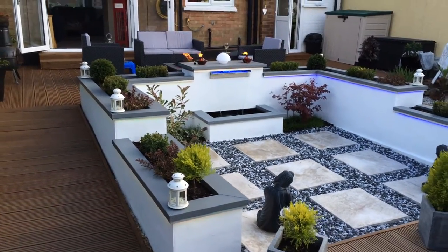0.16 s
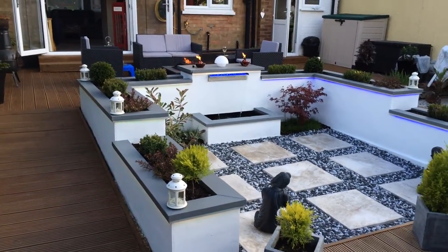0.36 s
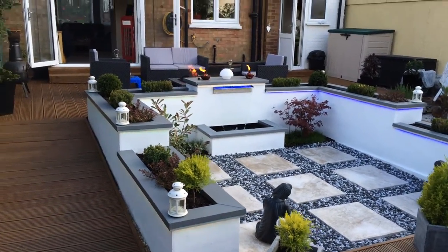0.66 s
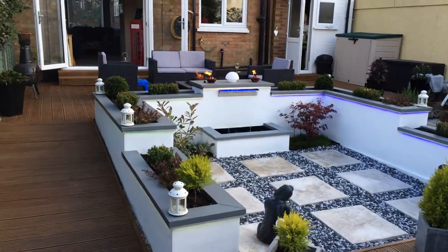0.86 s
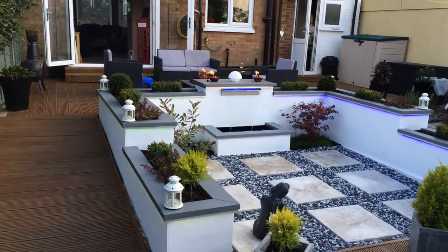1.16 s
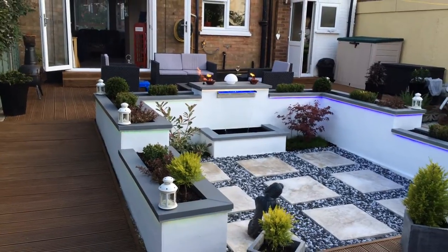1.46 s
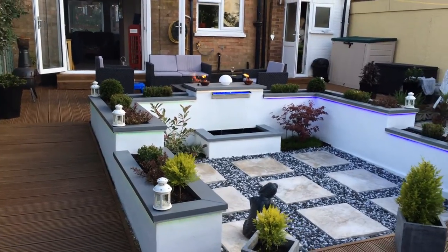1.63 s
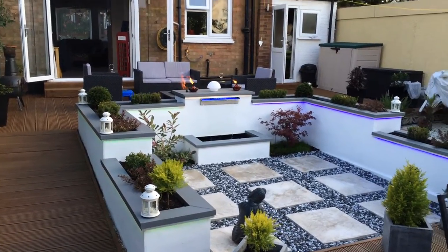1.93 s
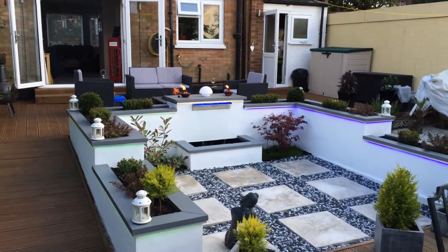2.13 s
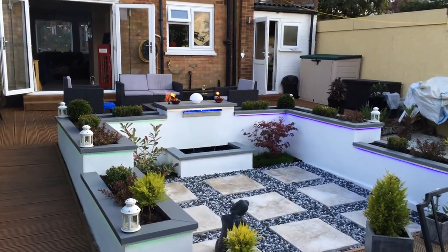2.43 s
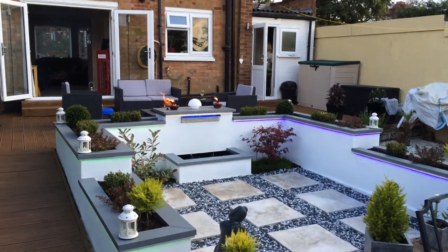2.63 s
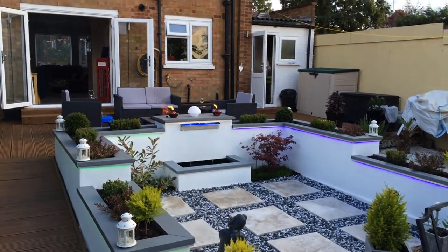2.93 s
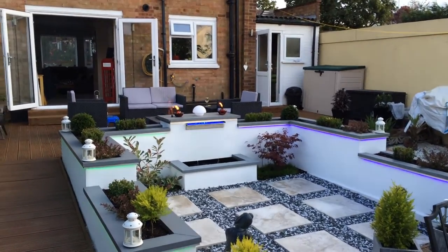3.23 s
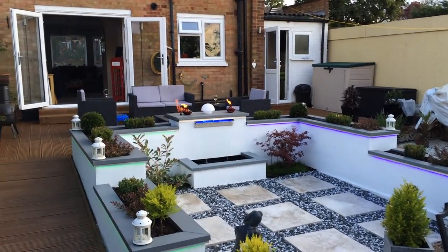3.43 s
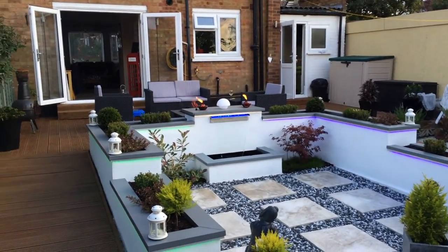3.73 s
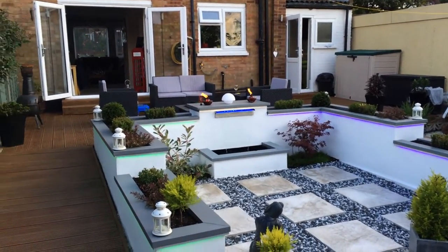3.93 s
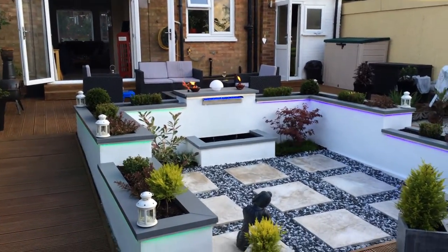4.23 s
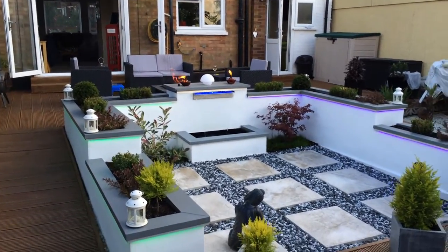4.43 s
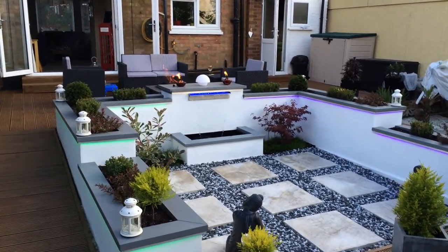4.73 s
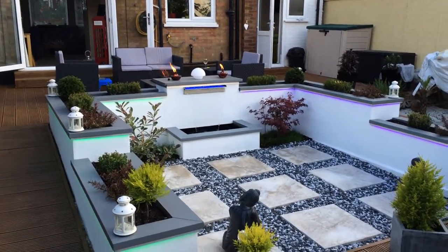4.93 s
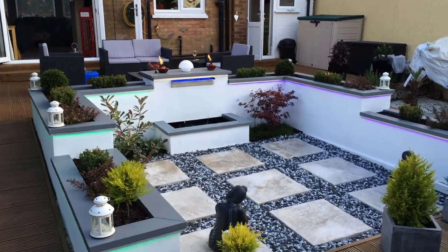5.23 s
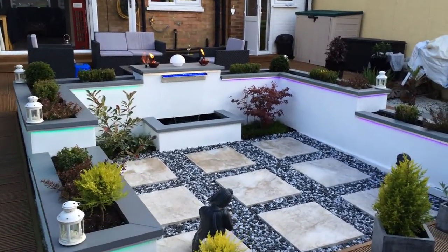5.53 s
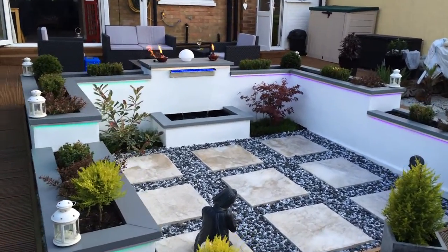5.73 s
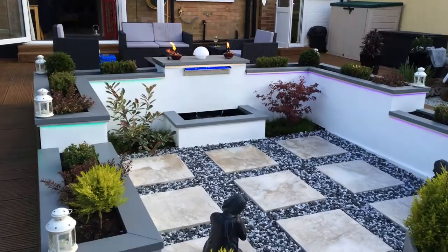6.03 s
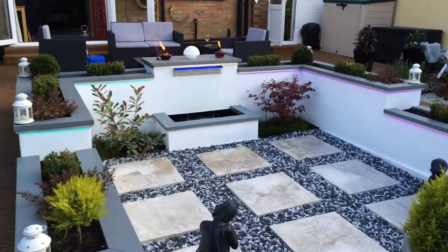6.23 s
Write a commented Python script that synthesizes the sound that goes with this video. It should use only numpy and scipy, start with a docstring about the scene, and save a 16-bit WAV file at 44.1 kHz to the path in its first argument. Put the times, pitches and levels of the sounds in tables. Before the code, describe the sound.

A thin stream of water trickles and bubbles steadily into a small garden pool, with soft handling bumps and a few sharp echoing clicks.

```python
"""From the start a thin stream of water trickles into a raised pool in a walled garden: noise wash, splash
grains and small ringing bubbles, over low churning, outdoor rumble, a far drone and a faint pump hum.
Soft bumps of the hand-held camera, damped thumps and case rattles, and larger bubble plips soon join in.
From 1.2 s sharp clicks, filtered pulses, bounce off paving, wall and house; near 2 s the grip changes.
The drone swells near 2.4 and 5 s, and the strongest clicks come from 3 s on."""
import sys
import numpy as np
from scipy import signal
from scipy.fft import rfft, irfft
from scipy.io import wavfile
from scipy.ndimage import uniform_filter1d

SR = 44100
rng = np.random.default_rng(int(sys.argv[2]) if len(sys.argv) > 2 else 0)


def wav_record(signal):
    """Record a signal, one row per channel, as 16-bit PCM in the file named by sys.argv[1]."""
    frames = np.transpose(np.atleast_2d(signal))
    bounded = np.clip(frames, -1, 1)
    # unit amplitude maps onto the largest positive 16-bit level
    quanta = np.round(bounded * 32767).astype(np.int16)
    wavfile.write(sys.argv[1], SR, quanta)


N = 280917  # length in samples
TIME = np.arange(N) / SR


def gain_of(db):
    """Decibels to amplitude."""
    return 10 ** (np.asarray(db) / 20)


def evened(x):
    """Scales to rms 1."""
    return x / np.sqrt(np.mean(x ** 2) + 1e-20)


def unit(x):
    """Scales to energy 1."""
    return x / (np.linalg.norm(x) + 1e-20)


def read(points, hz):
    """Reads a table on a log-frequency axis."""
    f, value = np.transpose(points)
    return np.interp(np.log(hz + 1), np.log(f + 1), value)


def add(mix, s, sound):
    """Mixes a sound in at time s."""
    part = mix[max(round(s * SR), 0):][:len(sound)]
    part += sound[:len(part)]


def coloured(x, points):
    """Filters by a spectrum; rms 1."""
    hz = np.fft.rfftfreq(len(x), 1 / SR)
    return evened(irfft(rfft(x) * gain_of(read(points, hz)), len(x)))


def drift(hz):
    """Slow chance up to about hz; rms 1."""
    lowpass = np.exp(-(np.fft.rfftfreq(N, 1 / SR) / hz) ** 2)
    return evened(irfft(rfft(rng.standard_normal(N)) * lowpass, N))


def swells(events):
    """Sums bell-shaped rises and dips, each given as (t/s, height, length/s)."""
    return sum(height * np.exp(-((TIME - s) / length) ** 2) for s, height, length in events)


def pulse(db):
    """The shortest causal pulse (minimum phase) with this spectrum; energy 1."""
    mirrored_db = np.r_[db, db[-2:0:-1]]
    log_gain = np.log(gain_of(np.maximum(mirrored_db, -70)))
    return unit(np.fft.ifft(np.exp(np.conj(signal.hilbert(log_gain)))).real)


def humps(peaks, hz):
    """The gain in dB of a few resonances."""
    return sum(db / (1 + (2 * (hz - f) / width) ** 2) for f, width, db in peaks)


def chance_times(per_s):
    """Irregular moments: one somewhere in each slot of 1 / per_s seconds."""
    slots = np.arange(int(per_s * N / SR) + 1)
    return (slots + rng.random(len(slots))) / per_s


# the hand changes its grip once, and with it the hollow around the microphone
REGRIP_S, REGRIP_LENGTH_S = 2, 0.33


def second_grip(s):
    """How far the hand has moved into its second grip, 0-1."""
    return .5 + .5 * np.tanh((s - REGRIP_S) / REGRIP_LENGTH_S)


# decay time of the garden's scatter: (f/Hz, t60/s)
GARDEN_DECAY = [(200, 0.64), (2000, 0.25), (5000, 0.3), (9000, 0.28), (15000, 0.14)]


def garden_tail(uneven_db=2.5, rise_s=0.0037):
    """Scatter from plants, gravel and walls: echoes of uneven size whose treble dies first."""
    sizes = gain_of(uneven_db * np.repeat(rng.standard_normal(SR // 32), 16))
    echoes = sizes * rng.standard_normal(len(sizes))
    hz, t, z = signal.stft(echoes, SR, nperseg=256)
    decay = gain_of(-60 * t / read(GARDEN_DECAY, hz)[:, None])
    tail = signal.istft(z * decay, SR, nperseg=256)[1]
    return unit(tail * np.clip(np.arange(len(tail)) / SR / rise_s, 0, 1))


def scatter(x, count=6):
    """Drops land all over the pool, so successive moments take different paths through the garden."""
    spot = np.floor(TIME * 80) % count
    out = np.zeros(N)
    for k in range(count):
        share = uniform_filter1d(1. * (spot == k), size=160)
        out += signal.oaconvolve(x * share, garden_tail())[:N]
    return out


def wash(patchy_db=2.0, flicker_db=2.0, smooth_hz=3800):
    """Countless merged splashes: patchy where bubbles ring, a fine even hiss above."""
    frames, hz = N // 128 + 5, np.fft.rfftfreq(512, 1 / SR)
    real, imaginary, patches = rng.standard_normal((3, frames, 257))
    patches = uniform_filter1d(patches, size=6, axis=0)
    patches = evened(uniform_filter1d(patches, size=4, axis=1))
    flicker = evened(uniform_filter1d(rng.standard_normal(frames), size=5))[:, None]
    level_db = patchy_db * patches / (1 + (hz / smooth_hz) ** 2) + flicker_db * flicker
    z = (real + 1j * imaginary) * gain_of(level_db)
    return signal.istft(z.T, nperseg=512, noverlap=384)[1][:N]


SPLASHES_PER_S = 800  # over all 16 pitches


def splashes(spread_db=2.5, wet_db=-2):
    """Drops smack the pool: grains of a cycle or two, a few much larger than the rest."""
    t, out = np.arange(256) / SR, np.zeros(N)
    for hz in np.geomspace(900, 14000, 16):
        size = gain_of(spread_db * np.minimum(rng.exponential(1, N), 4.5))
        hits = size * (rng.random(N) < SPLASHES_PER_S / 16 / SR)
        grain = unit(np.sin(2 * np.pi * hz * t) * np.exp(-hz * t / 0.81))
        out += signal.oaconvolve(hits, np.sqrt(hz) * grain)[:N]
    return out + gain_of(wet_db) * scatter(out)


def bubble(hz, cycles, rise):
    """Trapped air rings, rising in pitch as it nears the surface."""
    t = np.arange(2400) / SR
    age = t * hz / cycles
    ring = np.sin(2 * np.pi * hz * t * (1 + rise * np.minimum(age, 5)))
    return ring * np.exp(-age) * np.minimum(t * hz / 5, 1)  # fades in over five cycles


BUBBLES_PER_S = 230


def bubbles(low_hz=850, high_hz=3300, cycles=6.8, rise=0.021, spread_db=2.2, wet_db=-8):
    """A steady stream of small bubbles of random pitch, size and life."""
    out = np.zeros(N)
    for when, pitch, size, life in rng.random((int(BUBBLES_PER_S * N / SR), 4)):
        hz = low_hz * (high_hz / low_hz) ** pitch
        size_gain = gain_of(-spread_db * np.log(size + 0.054))
        add(out, when * N / SR, size_gain * unit(bubble(hz, cycles * (.5 + life), rise)))
    return out + gain_of(wet_db) * scatter(out)


# the trickle's spectrum: (f/Hz, relative level/dB per Hz)
WATER_SPECTRUM = [(150, -9.5), (350, -4.5), (600, -1.1), (1000, -2.5), (1400, -3), (1850, -0.5),
                  (2400, -4.5), (2900, -6), (3500, -5), (4200, -7), (5500, -5.5), (6600, -7), (8000, -11),
                  (11500, -13), (15000, -19)]
# resonances that colour the water, before random variation:
# (f/Hz, width/Hz, level/dB in the first grip, level/dB in the second)
HAND_HOLLOW = [(954, 110, 0.5, -0.5), (1280, 110, 2.5, 2), (1686, 56, 3.5, 5.5), (1680, 71, 0, -1.5),
               (2153, 59, 7, 3.5), (2550, 130, 3.5, 7), (3370, 114, -4, 5), (5040, 230, 4.5, 1.5)]


def in_basin(x, detune=0.02, vary=0.52, wander_hz=7, count=3):
    """The pool's colour and the hollow of the hand; resonances waver as the stream wanders. Rms 1."""
    hz, out = np.fft.rfftfreq(4096, 1 / SR), np.zeros(N)
    nearness = np.exp([drift(wander_hz) for spot in range(count)])
    later = second_grip(TIME)
    for share in nearness / nearness.sum(0):
        for grip, weight in enumerate([1 - later, later]):
            peaks = []
            for f, width, *db in HAND_HOLLOW:
                peak_hz = f * (1 + detune * rng.standard_normal())
                peaks.append((peak_hz, width, db[grip] * (1 + vary * rng.standard_normal())))
            colour = pulse(read(WATER_SPECTRUM, hz) + humps(peaks, hz))
            out += share * weight * signal.oaconvolve(x, colour)[:N]
    return evened(out)


SPUTTER_HZ, SPUTTER_DB = 27, 1.03  # smaller surges come at random
SPATTER_HZ, SPATTER = 250, 0.19  # surges land as spatters: fastest rate, depth as a share of their dB
# the stream slaps harder and throws spray, or slackens: (t/s, strength/dB before shares, length/s)
STREAM_SURGES = [(0.12, 5.5, 0.017), (0.217, 8.5, 0.023), (0.271, 6.5, 0.031), (0.499, 7, 0.032),
                 (0.54, 0, 0.021), (0.575, 2, 0.0081), (0.635, -4.5, 0.025), (0.689, 7.5, 0.011),
                 (0.902, 5.5, 0.031), (1.235, 3.5, 0.025), (2.124, 6.5, 0.012), (2.21, 0, 0.015),
                 (2.292, 3.5, 0.012), (2.68, 7, 0.0067), (3.37, 5, 0.019), (5.524, 8.5, 0.016),
                 (5.594, 8, 0.018), (5.82, 8, 0.011), (6.175, 7, 0.017)]


def surge_strength():
    """The unsteady stream's strength in dB: named and random surges, broken into spatters."""
    strength_db = SPUTTER_DB * drift(SPUTTER_HZ) + swells(STREAM_SURGES)
    return strength_db * (1 + SPATTER * np.clip(drift(SPATTER_HZ), -2, 2))


# loudness of the trickle: (t/s, level/dB before body and spray trims, extra spray level/dB)
STREAM_FLOW = [(0, -56, 0.5), (1.3, -56, 1), (1.9, -56, 0), (2.6, -55.5, -1), (3.2, -56.5, 1),
               (3.7, -57, 0), (4.2, -55, -1), (4.6, -56.5, -1), (5.1, -54.5, -0.5), (5.85, -56.5, 1),
               (6.37, -53.5, 1)]


def trickle(wash_db=-3.0, splash_db=-3, bubble_db=-5, body_db=1, spray_db=-4.5, split_hz=3000,
            body_share=0.38, spray_share=0.64, drop_share=0.26):
    """Wash, splashes and bubbles sound in the basin; surges lift the separate drops and the spray most."""
    surge_db = surge_strength()
    drops = gain_of(splash_db) * in_basin(splashes()) + gain_of(bubble_db) * in_basin(bubbles())
    water = gain_of(wash_db) * in_basin(wash()) + gain_of(drop_share * surge_db) * drops
    # body below the split, spray above it
    lowpass = signal.butter(4, split_hz, fs=SR, output="sos")
    body = signal.sosfiltfilt(lowpass, water)
    times, flow_db, extra_db = np.transpose(STREAM_FLOW)
    spray_level_db = spray_db + np.interp(TIME, times, extra_db) + spray_share * surge_db
    spray = evened(water - body) * gain_of(spray_level_db)
    body = body * gain_of(body_db + body_share * surge_db)
    return gain_of(np.interp(TIME, times, flow_db)) * (body + spray)


# the churning of the pool under the stream: (f/Hz, relative level/dB per Hz)
GURGLE_SPECTRUM = [(80, -34), (130, -13), (180, 3), (250, -6), (330, -2), (450, -12), (800, -34.5)]


def gurgle(level_db=-69.0, lumpy_db=4.0):
    """Low churning that comes and goes in uneven lumps."""
    lumps = gain_of(lumpy_db * np.clip(drift(9.5), -2, 1.5))
    churning = lumps * coloured(rng.standard_normal(N), GURGLE_SPECTRUM)
    return gain_of(level_db) * evened(churning)


# outdoor rumble: (f/Hz, relative level/dB per Hz)
RUMBLE_SPECTRUM = [(10, -50), (22, -38), (38, -12), (60, -10), (85, -3), (130, -4), (180, 2), (260, -4),
                   (350, -8), (600, -18), (1500, -26.5)]


def rumble(level_db=-60.5, lumpy_db=2):
    """Outdoor rumble: low noise whose level drifts in lumps."""
    return gain_of(level_db + lumpy_db * drift(9.4)) * coloured(rng.standard_normal(N), RUMBLE_SPECTRUM)


DRONE_HZ = 54.6
DRONE_START_DB, DRONE_GROWTH_DB_PER_S = -74.5, 1  # its mean rms level under the swells
# swells added to the drone: (t/s, mean rms level/dB, length/s)
FAR_DRONE_SWELLS = [(2.372, -64, 0.21), (5.003, -69, 0.7)]


def drone(waver=0.68):
    """A far drone: one low tone, unsteady in level and phase, that grows slowly and swells."""
    level = gain_of(DRONE_START_DB + DRONE_GROWTH_DB_PER_S * TIME)
    level += swells([(s, gain_of(db), length) for s, db, length in FAR_DRONE_SWELLS])
    tone = np.sin(2 * np.pi * DRONE_HZ * TIME + waver * drift(5.2))
    return np.sqrt(2) * level * gain_of(2.4 * drift(7.8)) * tone


HUM_HZ, HUM_DB = 101.3, -65.5  # level: mean rms
HUM_START_DB = -1.5  # the hum starts weaker and comes up over the first second or two


def hum(waver=0.75):
    """The faint hum of the pump: one tone that wavers in level and phase."""
    level_db = HUM_DB + HUM_START_DB * np.exp(-TIME ** 2) + 2.6 * drift(5.9)
    tone = np.sin(2 * np.pi * HUM_HZ * TIME + waver * drift(23.0))
    return np.sqrt(2) * gain_of(level_db) * tone


THUMP_RISE_S = 0.006  # every bump rocks the camera alike
# random smaller shifts of the hand; levels and pitch are typical values that vary
SHIFTS_PER_S, SHIFT_THUMP_DB, SHIFT_HZ, SHIFT_RATTLE_DB, SHIFT_RUB_S = 6, -58, 187, -61, .012
# bumps of the hand on the camera: (t/s, thump level/dB, thump f/Hz, rattle level/dB, rub length/s)
HAND_BUMPS = [(.05, -49.5, 234, -59, 0.018), (.098, -53, 210, -64, .02), (.136, -48, 222, -71, .02),
              (.1965, -43.5, 186, -39.5, .007), (.485, -55, 226, -55, .025),
              (.584, -49.5, 250, -47.5, 0.0073), (.6685, -38.5, 183, -45.5, 0.015),
              (.738, -49, 230, -52, .02), (.797, -53, 250, -64, .02), (.835, -52, 217, -56, .02),
              (1.536, -44.5, 181, -60, .02), (1.811, -48, 182, -59, .02), (1.925, -47, 187, -66, .02),
              (2.197, -47.5, 212, -52, .025), (2.0, -53, 180, -65, .02), (2.93, -56, 185, -68, .02),
              (3.075, -51, 182, -54, .012), (3.114, -50, 195, -59, 0.022), (3.42, -52, 190, -61, .02),
              (3.475, -46, 191, -53, .02), (3.727, -50, 188, -68, .02), (3.937, -56, 200, -48, 0.01),
              (3.951, -46, 180, -47.5, .016), (4.006, -51, 186, -59, .02), (4.06, -47.5, 186, -68, .02),
              (4.226, -52, 219, -51, .008), (4.237, -47, 193, -52, 0.018), (4.39, -51, 190, -62, .02),
              (4.632, -50, 250, -61, 0.022), (4.718, -49.5, 206, -55.5, .02), (4.828, -51, 233, -65, .02),
              (5.1412, -52, 216, -38.5, 0.0038), (5.1555, -43.5, 208, -42.5, 0.0065),
              (5.227, -50, 205, -52, .016), (5.381, -49, 191, -46.5, 0.023), (5.515, -46, 187, -44, 0.012),
              (5.68, -48, 195, -56, 0.018), (5.712, -39, 206, -70, .02), (5.861, -53, 183, -52, 0.0077),
              (5.921, -43, 183, -67, .02), (6.128, -43, 203, -47.5, .02), (6.171, -54, 195, -53, 0.009),
              (6.312, -57, 192, -48.5, .01), (6.3295, -56, 238, -37, 0.0015)]
# ringing of the camera's case:
# (f/Hz, relative level/dB in the first grip, relative level/dB in the second, t60/s)
CASE_RINGS = [(427, -11, -2.5, 0.028), (976, -19, -12, 0.022), (1350, -3, -5, .025), (1670, -11, -1, 0.052),
              (1785, 2.5, -2, 0.067), (2150, 0, -2.5, 0.036), (2550, -13, -6.5, .03),
              (3370, -24, -14, 0.03)]


def handling(spread_db=2.5, detune=0.16):
    """A soft push rocks the camera for a few cycles while a brief rub sets its case ringing."""
    t, out = np.arange(6000) / SR, np.zeros(N)
    age = t / THUMP_RISE_S
    rings = np.array([unit(np.sin(2 * np.pi * hz * t) * gain_of(-60 * t / t60))
                      for hz, _, _, t60 in CASE_RINGS])
    _, first_db, second_db, _ = np.transpose(CASE_RINGS)
    pushes = list(HAND_BUMPS)
    for s in chance_times(SHIFTS_PER_S):
        force, pitch = rng.standard_normal(2)
        force_db = spread_db * force
        pushes.append((s, SHIFT_THUMP_DB + force_db, SHIFT_HZ * np.exp(detune * pitch),
                       SHIFT_RATTLE_DB + force_db, SHIFT_RUB_S))
    for s, thump_db, hz, rattle_db, rub_s in pushes:
        case = gain_of(first_db + (second_db - first_db) * second_grip(s)) @ rings
        thump = np.sin(2 * np.pi * hz * t) * age * np.exp(1 - age)
        pressure = np.minimum(t / 0.00022, 1) * np.exp(-(t / rub_s) ** 2)
        rub = signal.fftconvolve(rng.standard_normal(len(t)) * pressure, case)[:len(t)]
        rattle = unit(rub) * np.linalg.norm(pressure)  # a longer rub carries more energy
        add(out, s, gain_of(thump_db) * thump + gain_of(rattle_db) * rattle)
    return out


# lesser bubbles rise at random; the level is a typical value
PLIPS_PER_S, PLIP_LOW_HZ, PLIP_HIGH_HZ, PLIP_DB = 6, 1500, 2970, -54
# the largest bubbles: (t/s, f/Hz before the pitch rise, level/dB before the ring's fade-in and decay)
LARGE_PLIPS = [(.105, 2200, -48), (.179, 2130, -44), (0.192, 1384, -44), (.2, 2150, -40), (.461, 2240, -47),
               (.484, 1500, -43), (.53, 2073, -52), (.718, 1153, -45.5), (1.075, 2140, -43),
               (1.3, 1610, -46.5), (1.457, 2150, -41), (2.225, 3140, -46), (2.431, 1690, -41),
               (2.524, 1650, -44.5), (2.625, 2060, -47), (2.676, 1730, -48), (2.734, 2100, -46),
               (3.101, 1415, -46), (3.266, 1510, -51), (3.348, 2140, -50), (3.42, 2700, -48),
               (4.02, 1700, -45), (4.287, 2560, -44.5), (4.34, 1650, -46), (4.549, 1650, -45.5),
               (4.698, 1165, -47), (4.785, 3400, -47.5), (4.815, 1650, -44), (4.904, 3370, -43.5),
               (4.968, 2170, -45.5), (5.467, 1830, -43.5), (5.683, 1280, -42.5), (5.862, 2310, -41),
               (6.041, 1950, -45), (6.143, 2530, -43.5), (6.214, 2120, -45)]


def plips(cycles=13, rise=0.0138, wet_db=-6, spread_db=-0.5, brood_db=-6, brood_s=.016,
          brood_cycles=6, brood_spread=0.24, count=4):
    """A blob of water traps one large bubble and a brood of short-lived ones; the garden scatters them."""
    out, lesser = np.zeros(N), []
    for s in chance_times(PLIPS_PER_S):
        hz = PLIP_LOW_HZ * (PLIP_HIGH_HZ / PLIP_LOW_HZ) ** rng.random()
        lesser.append((s, hz, PLIP_DB + spread_db * rng.standard_normal()))
    for s, hz, db in LARGE_PLIPS + lesser:
        add(out, s, gain_of(db) * bubble(hz, cycles, rise))
        for _ in range(count):
            pitch = hz * np.exp(brood_spread * rng.standard_normal())
            young = gain_of(db + brood_db) * bubble(pitch, brood_cycles, rise)
            add(out, s + brood_s * rng.random(), young)
    return out + gain_of(wet_db) * signal.oaconvolve(out, garden_tail())[:N]


PAVING_S, WALL_S, PLANTER_S, HOUSE_S = .00155, .00685, .022, .0407  # delays after the direct click


def click_tail(bloom_db=3, bloom_s=0.0076, clump_db=1.0):
    """The scatter of one click: it comes in clumps and swells as the planters answer."""
    tail = garden_tail(uneven_db=2.0)
    t = np.arange(len(tail)) / SR
    bloom = bloom_db * np.exp(-((t - PLANTER_S) / bloom_s) ** 2)
    return tail * gain_of(bloom + clump_db * drift(160)[:len(t)])


def smeared(sound, length, size):
    """A rough surface draws a pulse out, fading at rate 1 / length (s) within 2.9 ms; energy 1."""
    fade = np.exp(-np.arange(128) / SR / length)
    return unit(np.convolve(sound, np.r_[1, rng.standard_normal(128) * fade * size]))


TAIL_DB = -4.5  # the garden's scatter, relative to the direct sound and its first two echoes together
TAIL_RIPPLE_DB = 1.3  # each click's scatter has its own uneven resonances
# sharp clicks: (t/s, direct level/dB, paving echo level/dB, wall echo level/dB, wall tilt/dB per octave,
# colour centre f/Hz, fall-off/dB per octave squared, high ring level/dB, top edge f/Hz)
SHARP_CLICKS = [(1.226, -32, -37, -34, 5, 9000, -1, -3, 16000),
                (1.722, -28, -28, -34, 2, 14000, 20, 2, 17000),
                (2.122, -36, -30, -42, 2, 11500, 43, -3, 15000),
                (2.970, -14, -17.5, -19, -9, 4700, 2.5, -2, 12000),
                (5.185, -16.5, -28, -28, 6, 13500, 13, 7, 17000),
                (5.3113, -8, -13, 1, 2.5, 14000, 0.74, 2, 17200),
                (5.6526, -10, -12, -16, 0, 6200, 1.5, -4, 17000),
                (6.0067, -26, -15, -12.5, -2, 7000, 2.8, 4, 15000)]
# spectrum shared by the clicks: (f/Hz, relative level/dB)
CRACK_SPECTRUM = [(300, -5), (900, -0.5), (1500, -2), (3000, 0), (4500, -1), (5500, -3.5), (6200, 1),
                  (7700, 1.5), (10500, -0.5), (15000, 2.5)]
# narrow rings shared by the clicks: (f/Hz, width/Hz, level/dB)
CRACK_RINGS = [(1830, 380, 4.5), (2480, 130, 5.5), (3000, 240, 2.5), (5660, 720, 4.5)]
# the wall echo is hollow in the low treble: (f/Hz, relative level/dB)
WALL_SPECTRUM = [(1000, -7), (2800, 1.5), (4500, -12), (6200, -6), (7800, 1.5), (15000, -4.5)]


def clicks(house_db=-12.0, direct_colour=0.49, far_colour=0.87, ring_hz=7600, ring_width_hz=1800,
           smear_s=0.00066, smear_size=0.62, house_smear=5, wall_smear_size=0.12):
    """Each click arrives directly, then off the paving, the near wall and the house, amid scatter."""
    hz, out = np.fft.rfftfreq(1024, 1 / SR), np.zeros(N)
    crack_db = read(CRACK_SPECTRUM, hz) + humps(CRACK_RINGS, hz)
    for s, direct_db, paving_db, wall_db, wall_tilt_db, centre_hz, fall_db, ring_db, top_hz in SHARP_CLICKS:
        early_gain = np.linalg.norm(gain_of([direct_db, paving_db, wall_db]))
        tail_db = TAIL_DB + 20 * np.log10(early_gain)
        octaves = np.log2((hz + 50) / centre_hz)
        colour_db = -fall_db * octaves ** 2 - 10 * np.log10(1 + (hz / top_hz) ** 10)
        # the ring radiates away from the microphone, so it colours the echoes
        echo_db = crack_db + humps([(ring_hz, ring_width_hz, ring_db)], hz)
        ripple = evened(uniform_filter1d(rng.standard_normal(len(hz)), size=7))
        far_db = echo_db + far_colour * colour_db + TAIL_RIPPLE_DB * ripple
        paths = [(0, direct_db, crack_db + direct_colour * colour_db, smear_s),
                 (PAVING_S, paving_db, echo_db + colour_db, smear_s),
                 (HOUSE_S, tail_db + house_db, far_db, smear_s * house_smear)]
        for delay, db, spectrum_db, length in paths:
            add(out, s + delay, gain_of(db) * smeared(pulse(spectrum_db), length, smear_size))
        # the smooth near wall returns a crisp copy
        crisp = pulse(echo_db + colour_db + wall_tilt_db * octaves + read(WALL_SPECTRUM, hz))
        add(out, s + WALL_S, gain_of(wall_db) * smeared(crisp, smear_s, wall_smear_size))
        scattered = unit(signal.fftconvolve(pulse(far_db), click_tail()))
        add(out, s, gain_of(tail_db) * scattered)
    return out


def scene():
    """Everything that reaches the one microphone."""
    water = trickle() + gurgle() + plips()
    background = rumble() + drone() + hum()
    return (water + background + handling() + clicks())[None]


EDGE_HZ = 15330


def record(dry):
    """The recorder's band limit: a linear-phase low-pass."""
    lowpass = signal.firwin(401, EDGE_HZ, window=("kaiser", 8), fs=SR)
    return signal.oaconvolve(dry, lowpass[None], "same")


dry = scene()
out = record(dry)
wav_record(out)
```